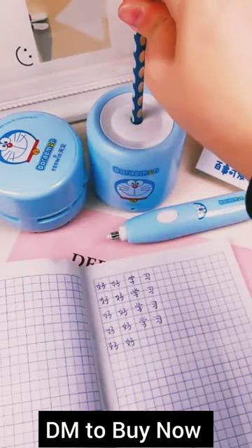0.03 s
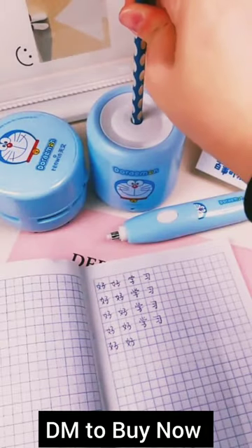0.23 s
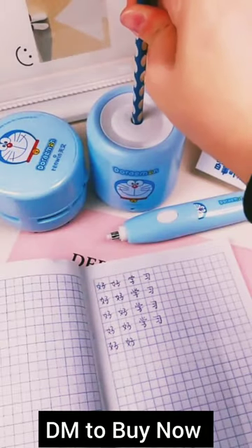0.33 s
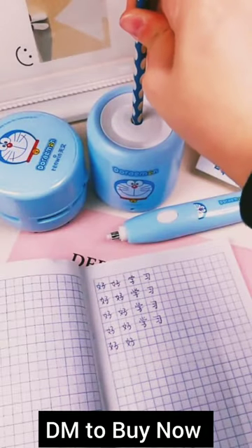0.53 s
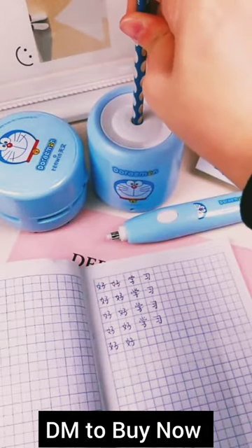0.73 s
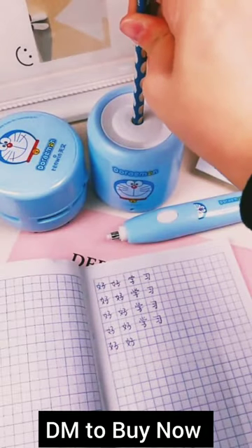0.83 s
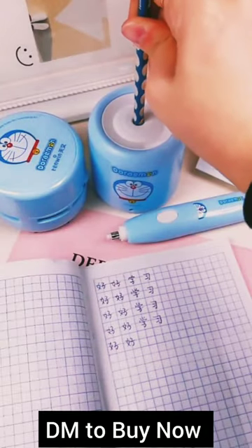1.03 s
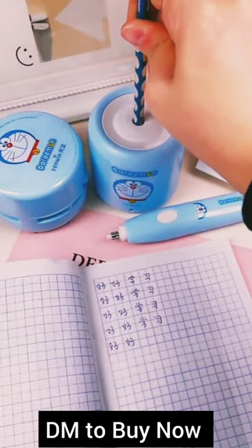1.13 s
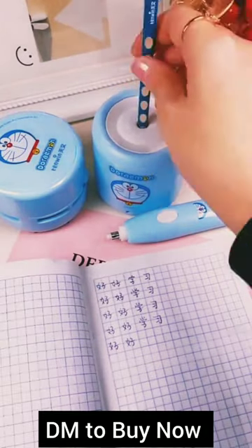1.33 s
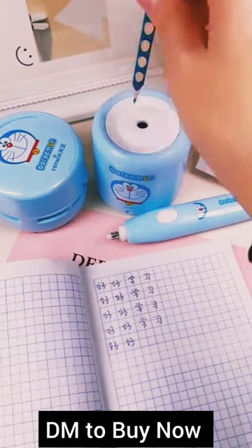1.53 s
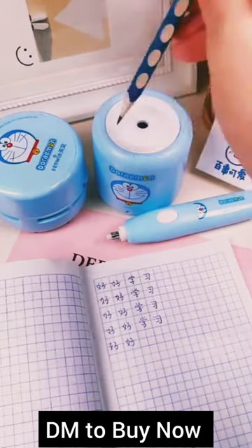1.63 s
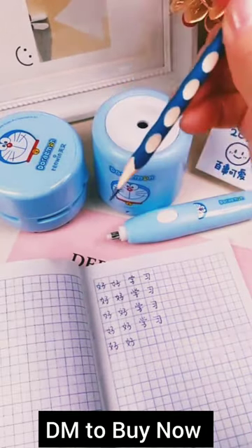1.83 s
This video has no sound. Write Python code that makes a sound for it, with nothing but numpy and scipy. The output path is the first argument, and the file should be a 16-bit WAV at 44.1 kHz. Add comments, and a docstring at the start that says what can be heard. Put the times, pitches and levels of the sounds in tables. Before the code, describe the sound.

A small electric pencil sharpener runs close by on a desk. After a light tick and a dull rush, it starts at about 0.2 seconds with a high, wavering whine, a blade rasping on wood and a rattling plastic shell. It stops near 1.45 seconds with a brief dull rush. Around 1.7 seconds the pencil lifts away with a soft brush and a tick over faint room hum.

```python
"""On a desk, a small electric pencil sharpener runs for just over a second. Its gear whines near 2 kHz
and sags at each turn of the cutter, the blade rasps on wood, the drive rings the plastic shell.
A tick and a dull rush precede the run; a shorter rush follows it. Then, over a faint room hum,
the pencil is lifted away with a soft brush and a tick."""
import sys
import numpy as np
from scipy import signal
from scipy.fft import rfft, irfft
from scipy.io import wavfile
from scipy.ndimage import uniform_filter1d

SR = 44100
rng = np.random.default_rng(int(sys.argv[2]) if len(sys.argv) > 2 else 0)


def wav_record(signal):
    """Record a signal, one row per channel, as 16-bit PCM in the file named by sys.argv[1]."""
    frames = np.transpose(np.atleast_2d(signal))
    bounded = np.clip(frames, -1, 1)
    # unit amplitude maps onto the largest positive 16-bit level
    quanta = np.round(bounded * 32767).astype(np.int16)
    wavfile.write(sys.argv[1], SR, quanta)


N = 83790
TIME_S = np.arange(N) / SR
FREQ_HZ = np.maximum(np.arange(N // 2 + 1) * SR / N, 1)

# gear whine: time_s, tooth_rate_hz, level_db
WHINE_TRACK = [(0.22, 2177, -20.5), (0.27, 2058, -19), (0.359, 2120, -26), (0.369, 2052, -27),
               (0.447, 2046, -26.5), (0.467, 1960, -19), (0.516, 1946, -15), (0.534, 2037, -35.5),
               (0.606, 1940, -17), (0.654, 2069, -25.5), (0.666, 1990, -15), (0.687, 2044, -31),
               (0.717, 1963, -20.5), (0.73, 2079, -25), (0.791, 2014, -24), (0.812, 1916, -26),
               (0.837, 2084, -51.5), (0.848, 2018, -18), (0.915, 1905, -19.5), (0.926, 1967, -22.5),
               (0.993, 2056, -20), (1.017, 1971, -24), (1.042, 2071, -28), (1.066, 2111, -13),
               (1.096, 2064, -44.5), (1.112, 1926, -18), (1.156, 2054, -23.5), (1.198, 2030, -24),
               (1.214, 1960, -20.5), (1.302, 2067, -27), (1.313, 1955, -12.5), (1.349, 2056, -33),
               (1.361, 2091, -16.5), (1.397, 2093, -16), (1.412, 1966, -19.5), (1.442, 2041, -29.5)]
# whine overtones: harmonic, gain_db
WHINE_OVERTONES = [(2, -4), (3, -19.5), (4, -10.5), (5, -18.5), (6, -19)]
# blade on wood: freq_hz, density_db
RASP_SPECTRUM = [(450, -40.5), (750, -16.5), (900, -9.5), (1250, -22), (1700, -3), (2150, -0.5),
                 (2350, -13.5), (2600, -3), (3200, 1), (4200, 1.5), (5000, -3), (5500, -2), (6000, 2.5),
                 (7200, 2.5), (8200, -0.5), (9250, -2.5), (10200, 2), (11300, -1), (12250, 0), (13000, -15)]
# rasp contour: time_s, level_db
RASP_ENVELOPE = [(0.23, -25.5), (0.246, -22), (0.364, -24.5), (0.378, -20.5), (0.526, -24.5), (0.572, -20),
                 (0.59, -23.5), (0.654, -21), (1.014, -22.5), (1.034, -25), (1.098, -20.5), (1.44, -23)]
# plastic case resonances: freq_hz, width_hz, level_db
SHELL_MODES = [(185, 72, -45.5), (268.6, 44.5, -44), (608.6, 40, -49), (1033, 213, -37.5),
               (1411, 120, -38.5), (2127, 380, -35.5), (4775, 65, -33.5), (5230, 76, -36.5),
               (6040, 280, -34), (5810, 170, -48), (6480, 170, -40.5), (8013, 93, -31.5), (9950, 340, -37),
               (12950, 200, -39)]
# pencil thumps in the cutter: start_s, level_db
THUMPS = [(.225, -40), (.29, -48), (.44, -47), (1.1, -40)]
# brush of the hand: freq_hz, density_db
BRUSH_SPECTRUM = [(200, 13.5), (500, 7), (1200, 7), (2500, 3), (4500, 2), (8000, -10), (13000, -8)]
# pencil ticks: start_s, level_db, decay_s, tilt_db_per_octave
TICKS = [(.019, -27.5, 0.0093, -13), (1.721, -45.5, 0.0089, 6.5)]
# resonances of a tick: freq_hz, width_hz, gain_db
TICK_MODES = [(1236, 430, -5), (1900, 200, 1), (2500, 540, -1.5), (4170, 1200, -6.5), (5000, 440, -3),
              (5760, 500, -17), (9300, 4200, -26)]
# dull rushes: start_s, stop_s, level_db
RUSHES = [(-.05, 0.205, -37), (1.463, 1.559, -39.5)]
# rush colour: freq_hz, density_db
RUSH_SPECTRUM = [(18, -47), (30, -4.5), (141, 0.5), (207, -6), (303, 0), (371, -8.5), (503, -4.5),
                 (756, -9), (1890, -17), (2490, -22.5), (6890, -36.5), (7430, -45), (13000, -36.5)]
# room hum: pitch_hz, level_db
HUM_TONES = [(54, -81), (150, -72.5), (237, -66)]
# room noise: freq_hz, density_db
FLOOR_SPECTRUM = [(18, -24.5), (30, -16), (87, -12), (110, -15), (149, -5.5), (197, -28), (241, -2),
                  (295, -35), (880, -33), (1160, -45), (13000, -55.5)]

START_S, ATTACK_S, STOP_S = 0.2125, 0.010, 1.4426


def sharpener():
    """One motor speed drives whine and rasp; the blade first catches with a bright scrape."""
    time_s, tooth_rate_hz, _ = np.array(WHINE_TRACK).T
    jitter = 1 + 0.011 * wander(rate_hz=230)
    tooth_rad = 2 * np.pi * np.cumsum(np.interp(TIME_S, time_s, tooth_rate_hz) * jitter) / SR
    bite = stereo_noise(resonance(6740, width_hz=900)) * undb(-24.5)
    bite *= burst(start_s=0.218, attack_s=0.0034, decay_s=0.05)
    running = gear_whine(tooth_rad) + blade_rasp(tooth_rad) + shell_ring()
    return running * gate(START_S, ATTACK_S, STOP_S, release_s=0.013) + bite


def gear_whine(tooth_rad):
    """Teeth mesh unevenly, so each partial flutters; reflections toss the tone between the sides."""
    time_s, _, level_db = np.array(WHINE_TRACK).T
    stereo_rad = np.array([tooth_rad, tooth_rad])
    flutter_db = 1.5 * np.array([wander(rate_hz=292), wander(rate_hz=260)])
    tone = desk_reflections(np.sin(stereo_rad) * undb(flutter_db))
    tone /= np.sqrt(uniform_filter1d(np.mean(tone ** 2, axis=0), size=600) + 1e-9)  # level evened out
    spurts_db = 2 * wander(rate_hz=50)
    tone *= undb(np.interp(TIME_S, time_s, level_db) + spurts_db)
    overtones = 0
    for harmonic, gain_db in WHINE_OVERTONES:
        smear_rad = 0.56 * wander(rate_hz=111)
        partial = np.sin(harmonic * stereo_rad + smear_rad) * undb(4.5 * wander(rate_hz=150))
        overtones += undb(gain_db) * desk_reflections(partial)
    first_cut_db = np.exp(-(np.maximum(TIME_S - START_S, 0) / 0.26) ** 2)
    overtones *= undb(level_db.mean() + first_cut_db)
    return (tone + overtones) * undb(-0.5) * gate(START_S, ATTACK_S, STOP_S, release_s=0.017)


def blade_rasp(tooth_rad):
    """Wood rasps with each tooth's push; narrow bands swell and fade as the contact moves round."""
    patch_db, patch_width_hz, patch_rate_hz = 5.5, 140, 13
    tooth_push = 1 + 0.39 * np.cos(tooth_rad)
    chips = rng.standard_normal((2, N)) * tooth_push * undb(0.65 * wander(rate_hz=250))
    band_hz, frame_s, bands = signal.stft(chips, SR, nperseg=1024)
    # random gain patches, smooth in frequency and time
    across_bands = np.fft.fftfreq(len(band_hz), band_hz[1])[:, None] * patch_width_hz
    along_time = np.fft.fftfreq(len(frame_s), frame_s[1]) / patch_rate_hz
    blur = np.exp(-across_bands ** 2 - along_time ** 2)
    patches = np.fft.ifft2(np.fft.fft2(rng.standard_normal(bands.shape[1:])) * blur).real
    chips = signal.istft(bands * undb(patch_db * patches / patches.std()), SR)[1][:, :N]
    time_s, level_db = np.array(RASP_ENVELOPE).T
    return filtered(chips, colour(RASP_SPECTRUM)) * undb(np.interp(TIME_S, time_s, level_db) + 2)


def shell_ring():
    """The rattling drive shakes the case modes, each in its own swells; the pencil thumps at times."""
    thumps = sum(undb(level_db) * burst(start_s, attack_s=0.0035, decay_s=0.034)
                 for start_s, level_db in THUMPS)
    out = stereo_noise(resonance(440, width_hz=95)) * thumps
    for freq_hz, width_hz, level_db in SHELL_MODES:
        pan_db = np.array([[-2.5], [2.5]]) / (1 + (freq_hz / 700) ** 2)  # low modes lean right
        mode = stereo_noise(resonance(freq_hz, width_hz))
        swell_db = 3.5 * wander(rate_hz=18)
        out += unit_rms(mode * undb(swell_db)) * undb(level_db + pan_db)
    return out


def desk_reflections(direct, t60_s=0.06, wet_db=4):
    """Direct sound plus a short cloud of reflections, different on each side; rms 1."""
    delay_s = TIME_S[:SR // 8]
    cloud = rng.standard_normal((2, len(delay_s))) * np.exp(-np.log(1000) * delay_s / t60_s)
    cloud *= undb(wet_db) / np.sqrt(np.sum(cloud ** 2, axis=1, keepdims=True))
    return unit_rms(direct + signal.fftconvolve(direct, cloud, axes=1)[:, :N])


def pencil_handling(brush_peak_s=1.68, brush_width_s=0.023):
    """The moving hand brushes softly; the pencil ticks before and after the run."""
    swell = np.exp(-((TIME_S - brush_peak_s) / brush_width_s) ** 2 / 2)
    out = stereo_noise(colour(BRUSH_SPECTRUM)) * undb(-58) * swell
    modes = sum(undb(gain_db) * resonance(freq_hz, width_hz) for freq_hz, width_hz, gain_db in TICK_MODES)
    for start_s, level_db, decay_s, tilt_db_per_octave in TICKS:
        ring = stereo_noise(modes * undb(tilt_db_per_octave * np.log2(FREQ_HZ)))
        out += ring * undb(level_db) * burst(start_s, 0.00017, decay_s)
    return out


def room(fade_s=0.006):
    """A dull rush before and after the run, over faint steady hum and noise."""
    envelope = sum(undb(level_db) * gate(start_s, fade_s, stop_s, fade_s)
                   for start_s, stop_s, level_db in RUSHES)
    rush = stereo_noise(colour(RUSH_SPECTRUM)) * envelope
    hum = sum(undb(level_db) * np.sqrt(2) * np.sin(2 * np.pi * (pitch_hz * TIME_S + rng.random()))
              for pitch_hz, level_db in HUM_TONES)
    return rush + hum + stereo_noise(colour(FLOOR_SPECTRUM)) * undb(-59)


def undb(db):
    """Decibels to gain."""
    return 10 ** (np.asarray(db) / 20)


def unit_rms(x):
    """Each channel scaled to rms 1."""
    return x / np.sqrt(np.mean(x ** 2, axis=-1, keepdims=True))


def filtered(x, response):
    """Filter by a gain per frequency; rms 1."""
    return unit_rms(irfft(rfft(x) * response, N))


def colour(spectrum):
    """Response through (freq_hz, density_db) points."""
    freq_hz, density_db = np.array(spectrum).T
    return undb(np.interp(np.log(FREQ_HZ), np.log(freq_hz), density_db))


def resonance(freq_hz, width_hz):
    """Resonant response with steep skirts."""
    detuning = (FREQ_HZ / freq_hz - freq_hz / FREQ_HZ) * freq_hz / width_hz / 2
    return 1 / (1 + detuning ** 2) ** 2


def wander(rate_hz):
    """Smooth random curve; rms 1."""
    return filtered(rng.standard_normal(N), np.exp(-(FREQ_HZ / rate_hz) ** 2))


def stereo_noise(response, mono_below_hz=170):
    """Coloured noise, alike on both sides in the bass; rms 1."""
    mid, side = rfft(rng.standard_normal((2, N)))
    spread = FREQ_HZ / (FREQ_HZ + mono_below_hz) * np.array([[1], [-1]])
    return unit_rms(irfft(response * (mid + side * spread), N))


def gate(start_s, attack_s, stop_s, release_s):
    """Quadratic attack, hold, exponential release."""
    rise = np.clip((TIME_S - start_s) / attack_s, 0, 1) ** 2
    return rise * np.exp(-np.maximum(TIME_S - stop_s, 0) / release_s)


def burst(start_s, attack_s, decay_s):
    """Gate with no hold."""
    return gate(start_s, attack_s, start_s, decay_s)


def scene():
    """Sharpener, pencil and room."""
    return sharpener() + pencil_handling() + room()


def record(dry, ceiling=0.65, cutoff_hz=13100):
    """Soft peak limit, then a steep low-pass."""
    rounded = dry / (1 + (dry / ceiling) ** 4) ** 0.25
    return signal.sosfilt(signal.ellip(10, 0.2, 90, cutoff_hz, fs=SR, output="sos"), rounded)


dry = scene()
out = record(dry)
wav_record(out)
```